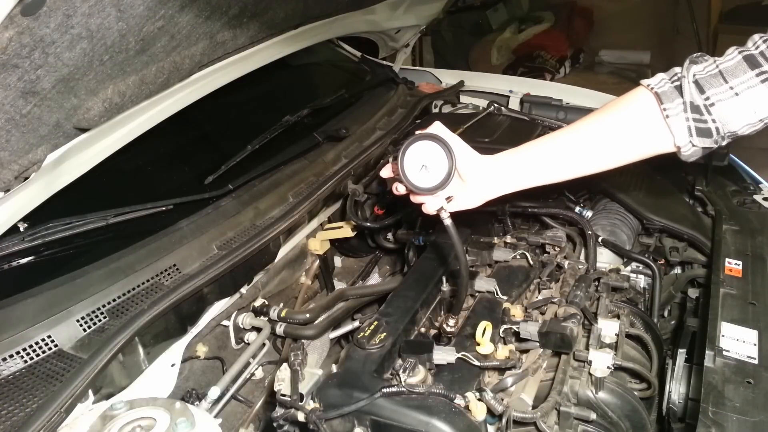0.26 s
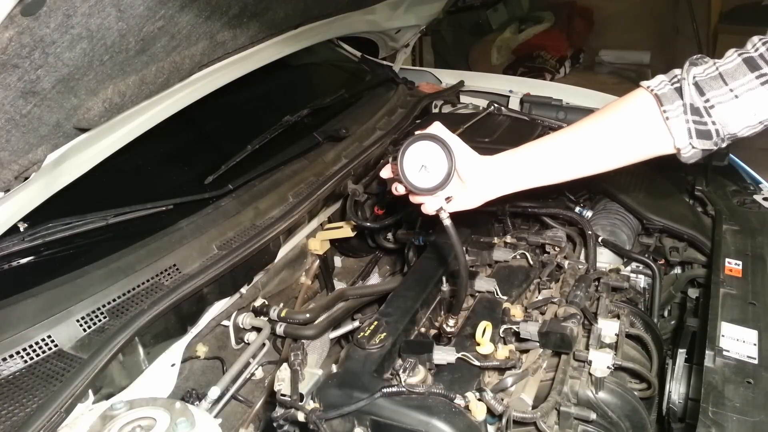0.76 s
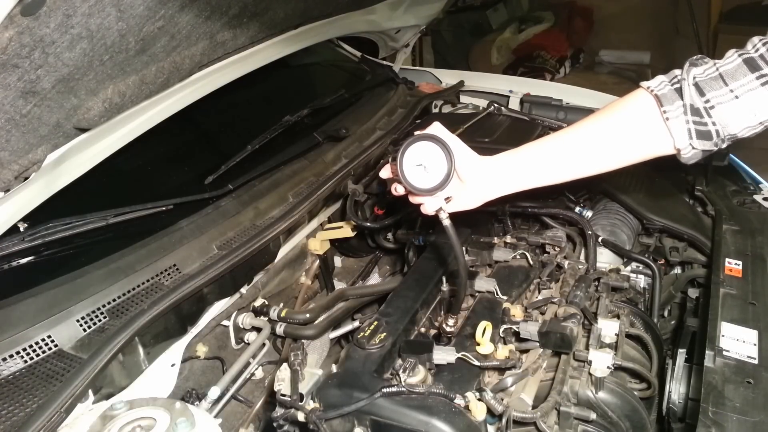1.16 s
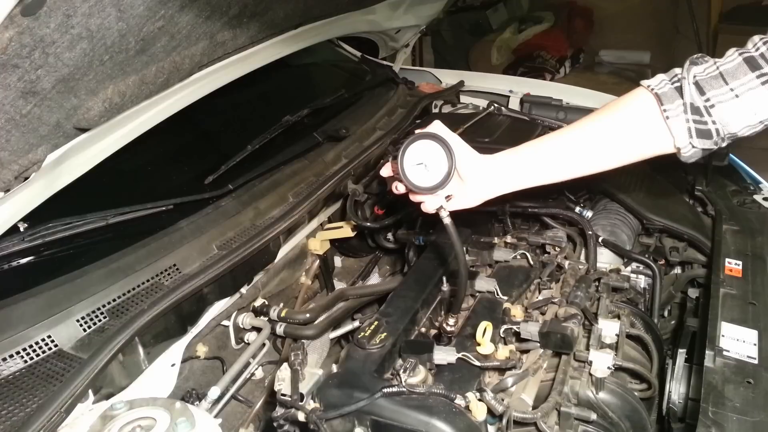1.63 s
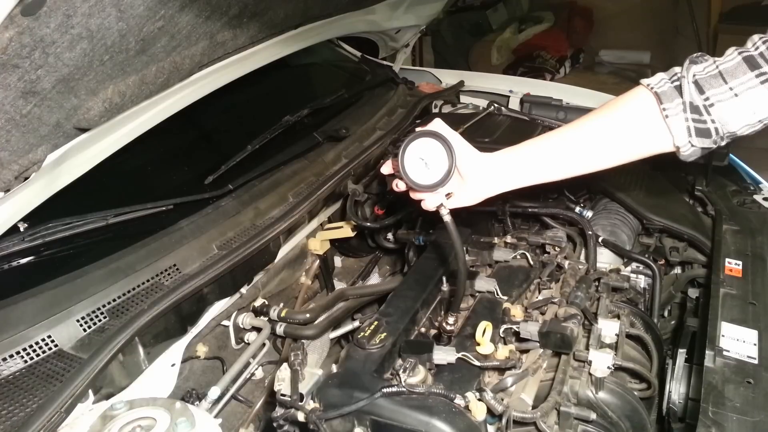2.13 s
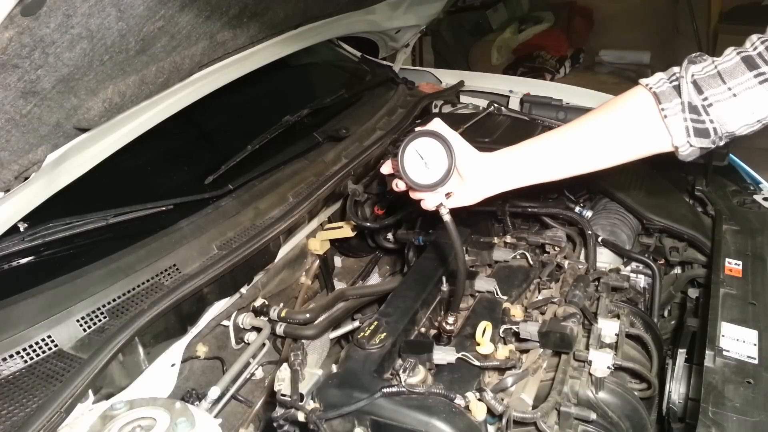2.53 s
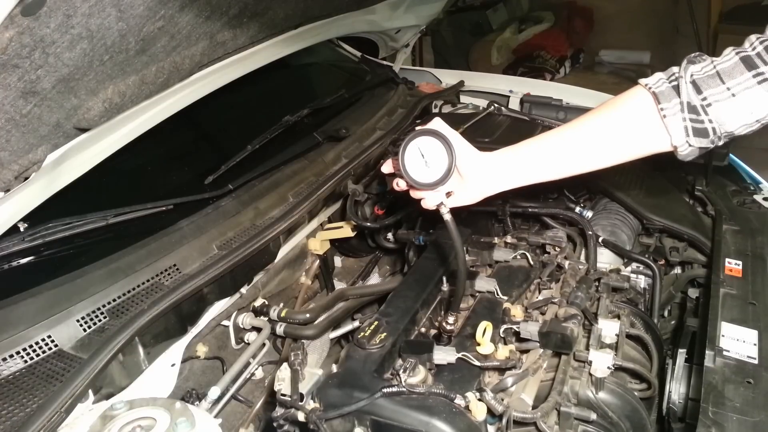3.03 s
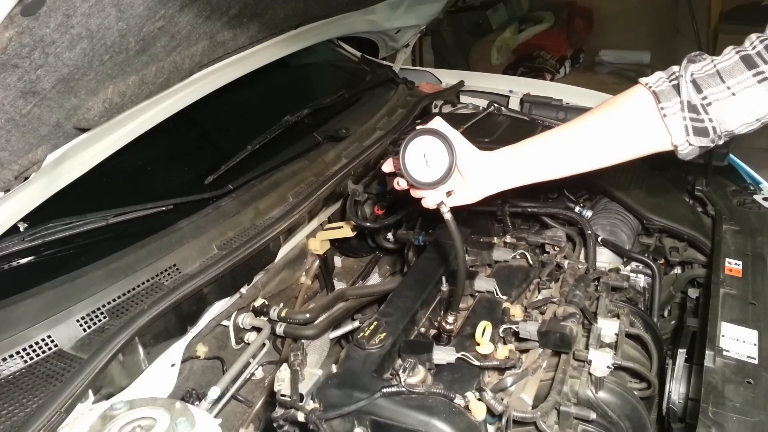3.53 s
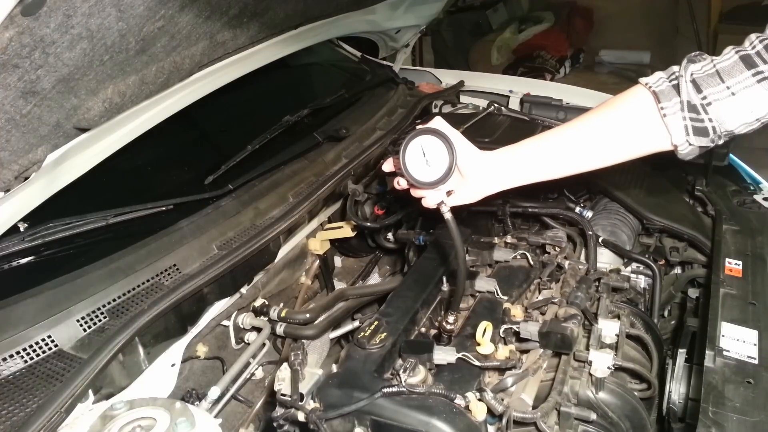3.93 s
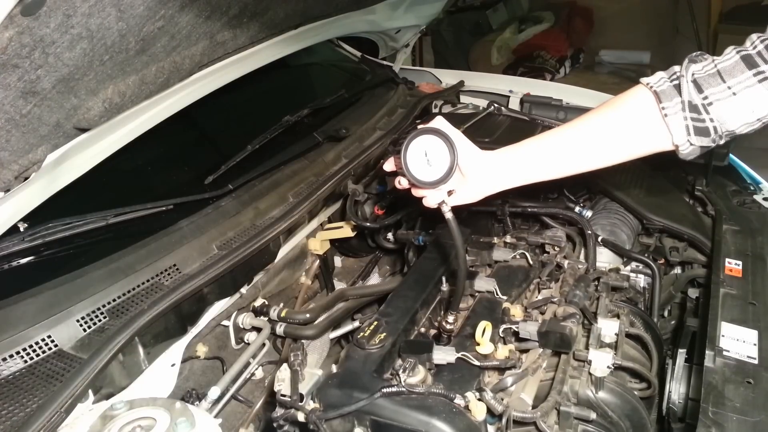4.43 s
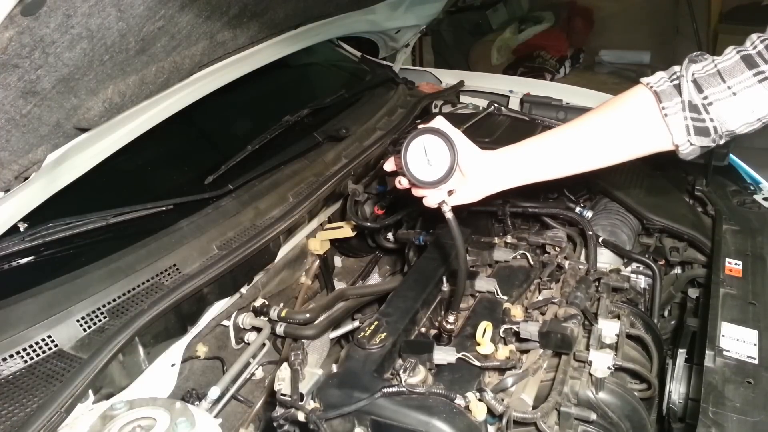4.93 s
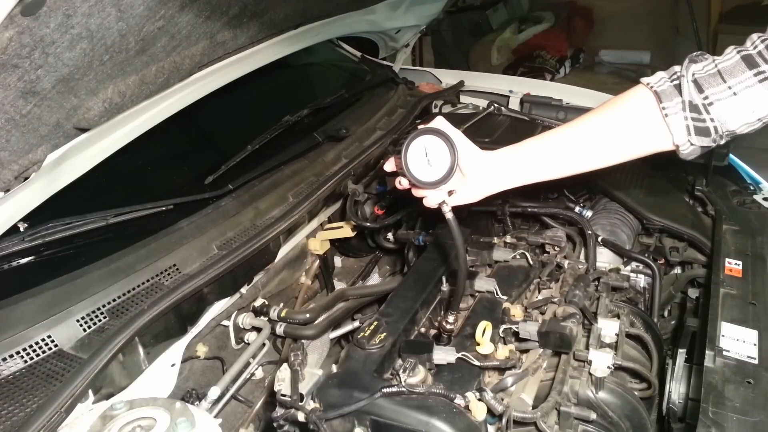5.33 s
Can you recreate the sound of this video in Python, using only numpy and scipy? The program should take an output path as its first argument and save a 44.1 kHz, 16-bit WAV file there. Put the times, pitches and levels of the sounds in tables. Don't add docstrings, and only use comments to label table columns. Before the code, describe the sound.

Close, loud stereo pickup of a car engine being cranked. First a thin pump whine over a distant low rumble, then a pause, a tiny hum and a hard metal clack. A rising gear whir sags into a groan, followed by about nine raspy, buzzing, clattering slaps per second, with short garage echo and slightly overloaded peaks.

```python
import sys
import numpy as np
from scipy import signal
from scipy.io import wavfile
from scipy.ndimage import uniform_filter1d, minimum_filter1d

SR = 44100
rng = np.random.default_rng(int(sys.argv[2]) if len(sys.argv) > 2 else 0)


def decibels_to_gain(level_db):
    exponent = np.asarray(level_db, float) / 20
    return 10 ** exponent


def waveform_to_disk(signal):
    frames = np.transpose(np.atleast_2d(signal))
    scaled = np.clip(frames, -1, 1) * 32767
    samples = np.round(scaled).astype(np.int16)
    wavfile.write(sys.argv[1], SR, samples)


N = 245637
T = np.arange(N) / SR


def evened(x):
    return x / np.sqrt(np.mean(x ** 2) + 1e-20)


def read(points, hz):
    f, value = np.transpose(points)
    return np.interp(np.log(hz + 1), np.log(f + 1), value)


def curve(points, t=T):
    return np.interp(t, *np.transpose(points))


def swell(db, peak, rise, hold, fade):
    return db - rise * np.maximum(peak - T, 0) - fade * np.maximum(T - peak - hold, 0)


# (frequency [Hz], likeness [-1 to 1])
COHERENCE = [(60, 0.31), (180, 0.83), (530, 0.62), (1590, -0.016), (4730, -0.05), (14100, 0.015)]
# (frequency [Hz], left over right [dB])
BALANCE = [(60, -9), (130, 2), (290, -1.5), (620, 1.5), (1360, -4), (2960, 2), (6460, -4.5), (14100, -8)]


def hiss(spectrum, peaks, patchy_db):
    frames, hz = N // 128 + 5, np.fft.rfftfreq(2048, 1 / SR)
    colour_db = read(spectrum, hz)
    for f, width, db in peaks:
        colour_db = colour_db + db / (1 + (2 * (hz - f) / width) ** 2)
    a, b, c, d, patches = rng.standard_normal((frames // 4, 1025, 5)).T
    patches = uniform_filter1d(patches, size=9, axis=0)
    patches = evened(uniform_filter1d(patches, size=3, axis=1))
    same = np.clip(read(COHERENCE, hz), -1, 1)[:, None]
    left = a + 1j * b
    right = same * left + np.sqrt(1 - same ** 2) * (c + 1j * d)
    lean_db = np.multiply.outer([.5, -.5], read(BALANCE, hz))[..., None]
    z = np.array([left, right]) * decibels_to_gain(colour_db[:, None] + patchy_db * patches + lean_db)
    return evened(signal.istft(z, nperseg=2048, noverlap=1536)[1][:, :N])


# (frequency [Hz], density [dB per Hz])
YARD_SPECTRUM = [(24, -52), (40, -53), (152, -8), (209, -16), (248, -10.5), (483, -5.5), (589, -6.5),
                 (666, -6), (1700, -23), (5980, -41.5), (14500, -36.5)]
# (time [s], level [dB])
YARD_ENVELOPE = [(0, -45), (.3, -44.5), (.6, -44), (.8, -45.5), (1.04, -49)]


def yard():
    return decibels_to_gain(curve(YARD_ENVELOPE) + 3) * hiss(YARD_SPECTRUM, [], 0.38)


# (frequency [Hz], level [dB])
WHINE_TONES = [(1599, -72), (2401, -62), (3198, -77), (4000, -66), (7197, -84)]


def whine():
    out = np.zeros((2, N))
    for hz, db in WHINE_TONES:
        out += decibels_to_gain(db + 1) * np.sin(2 * np.pi * (hz * T + rng.random((2, 1))))
    return out


# (frequency [Hz], density [dB per Hz])
PUMP_SPECTRUM = [(530, -29), (900, -11), (944, -26), (1000, -7), (1310, -9), (1470, -6.5), (1850, -4.5),
                 (2250, -3), (3430, -10), (4200, -8.5), (5150, -16), (5300, -25), (7300, -28), (11700, -67),
                 (19800, -120)]
# (frequency [Hz], width [Hz], gain [dB])
PUMP_RESONANCES = [(2300, 90, 7), (2620, 80, 4), (4400, 150, 5), (5050, 250, 6)]
# (level [dB], peak time [s], rise [dB per s], hold [s], fade [dB per s])
PUMP_SWELLS = [
    (-38.5, 0, 1000, .616, 600),
    (-45.5, 0, 1000, .63, 160),
    (-54, 0, 1000, .68, 900),
]


def fuel_pump():
    running, echo, cut = [swell(*row) for row in PUMP_SWELLS]
    level = np.minimum(np.maximum(running, echo), cut + 20)
    return decibels_to_gain(level) * hiss(PUMP_SPECTRUM, PUMP_RESONANCES, 1.5)


# (time [s], level [dB])
COIL_ENVELOPE = [(1.015, -70), (1.03, -45), (1.07, -40), (1.09, -72)]


def relay_coil():
    powered = (T < 1.09) * (T > 1.015)
    return decibels_to_gain(curve(COIL_ENVELOPE)) * np.sin(2 * np.pi * 420 * T) * powered


# (frequency [Hz], density [dB per Hz])
CLATTER_SPECTRUM = [(59, -76), (100, -25), (255, -25.5), (387, -5), (613, -3), (855, -3.5), (1050, -2),
                    (1740, -2), (2180, -6.5), (4620, -7), (5690, -18), (6450, -16), (14500, -34)]
# (time [s], level [dB])
PINION_HITS = [(1.056, -48), (1.071, -23), (1.084, -1.5), (1.107, -0.5), (1.133, -14), (1.3, -27)]


def engage():
    level = np.zeros(N)
    for s, db in PINION_HITS:
        level += decibels_to_gain(db - 60 * np.maximum(T - s, 0) / .1) * (T > s)
    resonances = [(1710, 160, 11), (3980, 2900, 12.2), (7600, 1700, 5), (12600, 6200, 9.4)]
    return level * hiss(CLATTER_SPECTRUM, resonances, 1.6)


# (time [s], strength [dB], second tooth overtone [Hz])
SETTLING_SLAPS = [(1.501, -11, 711.3), (1.624, -13.5, 808), (1.747, -16, 713), (1.862, -12, 829),
                  (1.986, -15.5, 816), (2.101, -13, 824), (2.218, -17, 817), (2.329, -11.5, 817),
                  (2.447, -12.5, 811.4), (2.559, -13, 813), (2.675, -14, 821), (2.788, -11.5, 807)]
# (time [s], strength [dB], second tooth overtone [Hz])
STEADY_SLAPS = [(2.902, -15.5, 813.5), (3.015, -10, 808.4), (3.13, -9, 812), (3.24, -11, 806),
                (3.354, -13.5, 822), (3.466, -9.5, 822), (3.58, -11, 822.6), (3.693, -11, 817.6),
                (3.805, -13.5, 818), (3.916, -12.5, 821.6), (4.027, -13.5, 814), (4.14, -9, 807.4),
                (4.255, -15.5, 824), (4.365, -14, 816), (4.479, -16, 836), (4.586, -9, 822),
                (4.699, -15, 830.3), (4.815, -12, 820.4), (4.921, -16.5, 821), (5.033, -16, 854),
                (5.144, -14.5, 824), (5.255, -12, 830), (5.368, -12, 818), (5.476, -8.5, 811)]
# (clatter [dB], knock [dB], ring [dB])
CYLINDER_VOICES = [(0.65, -16.5, -10.5), (1, -15.5, -10.5), (0.9, -15.5, -10.5), (.8, -16.5, -8.5)]


def strokes():
    s, buzz_db, hz = np.transpose(SETTLING_SLAPS + STEADY_SLAPS)
    clatter_db, knock_db, ring_db = np.resize(CYLINDER_VOICES, (len(s), 3)).T
    return np.transpose([s, clatter_db, hz, buzz_db, knock_db, ring_db])


def by_stroke(shape, column, t60=np.inf):
    top_db, peak, ahead_db, bend, quick, tail_db, slow = shape
    ahead_s = .008
    t = T[:round(.138 * SR)] - ahead_s
    rise = top_db - (top_db - ahead_db) * (np.maximum(peak - t, 0) / (peak + ahead_s)) ** bend
    fall = np.maximum(top_db - quick * (t - peak), tail_db - slow * t) - 60 * (t - peak) / t60
    one = np.where(t < peak, rise, np.minimum(fall, top_db))
    level = np.full(N + len(t), -120.)
    for row in strokes():
        i = round((row[0] - ahead_s) * SR) + np.arange(len(t))
        level[i] = np.maximum(level[i], row[column] + one)
    return level[:N]


GROAN_S = 1.298
# (level [dB], peak time [s], rise [dB per s], hold [s], fade [dB per s])
SPIN_UP_SWELLS = [
    (-27, 1.185, 300, .075, 450),
    (-31.5, 1.13, 450, 0.028, 90),
    (-16, 1.105, 700, .12, 330),
    (-21, 1.085, 1500, 0.19, 30),
]
# (level [dB], peak time [s], rise [dB per s], hold [s], fade [dB per s])
GROAN_SWELLS = [
    (-11.5, 1.308, 4800, .055, 210),
    (-14.5, 1.335, 580, 0.018, 170),
    (-12, 1.367, 200, .02, 160),
    (-13, 1.312, 840, .07, 110),
]


def started(layer):
    level = np.where(T < GROAN_S, swell(*SPIN_UP_SWELLS[layer]), swell(*GROAN_SWELLS[layer]))
    return np.where(T < SETTLING_SLAPS[0][0], np.maximum(level, -120), -120)


def starting_hz():
    free = 256.4 - 51 * np.exp(-np.maximum(T - 1.1, 0) / .08)
    loaded_hz, stalled_hz = 352.6, 288
    sink = .5 + .5 * np.tanh((T - 1.375) / (2 * .021))
    return np.where(T < GROAN_S, free, loaded_hz + (stalled_hz - loaded_hz) * sink)


def tooth_turns():
    rows = strokes()
    slap_s = rows[:, 0] - .006
    last = rows[np.maximum(np.searchsorted(slap_s, T) - 1, 0)]
    sag = .075 * (1 - np.exp(-np.maximum(T - last[:, 0], 0) / .06))
    hz = np.where(T < slap_s[0], starting_hz(), last[:, 2] / 2 * (1.016 - sag))
    waver = evened(uniform_filter1d(rng.standard_normal(N), size=150))
    return np.cumsum(hz * (1 + .014 * waver)) / SR


# (frequency [Hz], density [dB per Hz])
GRIND_SPECTRUM = [(59, -55), (100, -26), (364, -2), (1630, -0.5), (2280, -4), (2750, 1), (4250, -3),
                  (5690, -10), (6320, -11.5), (9590, -22.5), (10600, -35), (12800, -41), (14500, -92)]
# (frequency [Hz], width [Hz], gain [dB])
HOUSING_RESONANCES = [(165, 30, 6), (345, 35, 5), (675, 30, 7), (1090, 60, 5), (1220, 50, 5), (1585, 45, 6),
                      (1715, 50, 4), (2690, 35, 9), (2810, 50, 5), (4250, 80, 5), (6100, 90, 4),
                      (6570, 60, 5), (7870, 35, 4)]
# (peak [dB], peak time [s], level 8 ms ahead [dB], bend of the rise [power],
# quick fade [dB per s], tail [dB], tail fade [dB per s])
CLATTER_ENVELOPE = (2.5, .004, -17, 3, 560, -1.5, 240)
GRIND_ENVELOPE = (-3.5, .001, -18, 1.2, 220, -5, 56)


def rasp(turns):
    tooth = evened(1 + 0.48 * np.exp(-(turns % 1) / 0.5))
    clatter_db = np.maximum(by_stroke(CLATTER_ENVELOPE, column=1) - 6, started(layer=3) - 1.5)
    grind_db = np.maximum(by_stroke(GRIND_ENVELOPE, column=1) - 12, started(layer=2) - 1.5)
    clatter = hiss(CLATTER_SPECTRUM, HOUSING_RESONANCES[5:], 1.75)
    grind = hiss(GRIND_SPECTRUM, HOUSING_RESONANCES, 1.86)
    clatter = decibels_to_gain(uniform_filter1d(clatter_db, size=60)) * clatter
    grind = decibels_to_gain(uniform_filter1d(grind_db, size=60)) * grind
    return tooth * clatter + grind


# (order [multiple of tooth rate], level [dB], t60 [s], left over right [dB])
TOOTH_OVERTONES = [(1, -4, .06, 0), (2, 4, .3, 1), (3, -11, .12, -2), (4, -8, .1, 0), (5, -13, .1, 0),
                   (6, -14, .09, 1), (9, -16, .08, 0)]
# (peak [dB], peak time [s], ahead [dB], bend [power], quick fade [dB per s], tail [dB], tail fade [dB per s])
BUZZ_ENVELOPE = (7, .006, -42, 2.1, 530, 4, 440)


def buzz(turns):
    out = np.zeros((2, N))
    voices = {1: (4, 1, 2.5), 2: (3, 0, 2.5), 3: (5, 2, 7)}
    for order, db, t60, lean_db in TOOTH_OVERTONES:
        column, layer, cut_db = voices[min(round(order), 3)]
        level = np.maximum(by_stroke(BUZZ_ENVELOPE, column, t60), started(layer) - cut_db)
        flutter_db = 2.7 * evened(uniform_filter1d(rng.standard_normal(N), size=250))
        lead = .04 * order ** 2
        phase = 2 * np.pi * (round(order) * turns + rng.random()) + np.array([[lead], [0]])
        side_db = np.array([[.5], [-.5]]) * lean_db
        out += decibels_to_gain(db + level + flutter_db + side_db) * np.cos(phase)
    return out


def knocks(modes, column, rise, stray):
    t, out, rows = T[:SR // 4], np.zeros(N), strokes()
    for row, luck in zip(rows, rng.standard_normal((len(rows), len(modes)))):
        ring = np.zeros(len(t))
        for (hz, db, t60), u in zip(modes, luck):
            decay = decibels_to_gain(db + 5 * stray * u - 60 * t / t60)
            ring += decay * np.sin(2 * np.pi * hz * t + 3 * stray * u)
        part = out[round((row[0] - .004) * SR):][:len(t)]
        part += (decibels_to_gain(row[column]) * ring * (1 - np.exp(-(t / rise) ** 2)))[:len(part)]
    return out


# (frequency [Hz], level [dB], t60 [s])
BELL_MODES = [(1085, -9, .2), (1220, 0, .11), (1580, -10, .14), (1712, 1, .11), (1940, -9, .08),
              (2400, -8, .1)]


def bell_housing():
    centre, left, right = (knocks(BELL_MODES, column=5, rise=.005, stray=.45) for part in range(3))
    return centre + 0.67 * np.array([left, right])


# (frequency [Hz], level [dB], t60 [s])
BLOCK_MODES = [(165, -24, .25), (208, -27, .2), (345, -10, .25), (388, -14, .2), (430, -7, .22),
               (462, 2, .085), (675, -4, .2)]


def block():
    return decibels_to_gain(5.5) * knocks(BLOCK_MODES, column=4, rise=.0019, stray=.29)


def garage(x, t60):
    length, gap = SR // 2, 22
    slots = np.arange(200, length - gap, gap)
    at = slots + rng.integers(0, gap, (2, len(slots)))
    taps = np.zeros((2, length))
    np.put_along_axis(taps, at, rng.choice([-1., 1.], at.shape), 1)
    taps *= decibels_to_gain(-60 * T[:length] / t60)
    low = signal.lfilter(*signal.butter(2, 900, fs=SR), taps)
    tail = taps - low + low[0]
    return signal.fftconvolve(x, tail / np.linalg.norm(tail[0]), axes=1)[:, :N]


def scene():
    turns = tooth_turns()
    tonal = buzz(turns) + block() + bell_housing() + engage()
    crank = tonal + decibels_to_gain(-12) * garage(tonal, t60=0.21) + rasp(turns)
    small = signal.butter(4, 110, "high", fs=SR, output="sos")
    return signal.sosfilt(small, crank) + yard() + fuel_pump() + whine() + relay_coil()


def low_pass(x):
    return signal.sosfilt(signal.butter(12, 14690, fs=SR, output="sos"), x)


def record(dry):
    peak = -minimum_filter1d(-abs(dry).max(0), size=220)
    over_db = np.maximum(20 * np.log10(uniform_filter1d(peak, size=220) + 1e-9) + 0.6, 0)
    mix = np.clip(dry / decibels_to_gain(.57 * over_db), -1, 1)
    return low_pass(mix)


dry = scene()
out = record(dry)
waveform_to_disk(out)
```